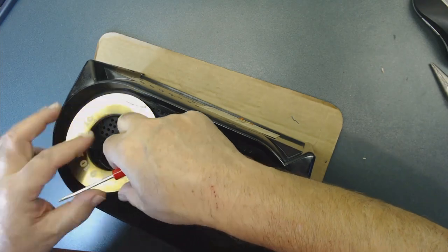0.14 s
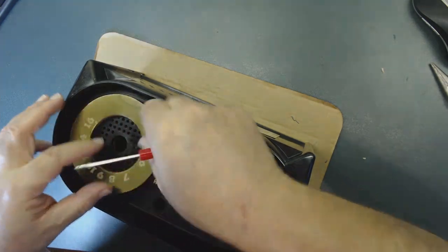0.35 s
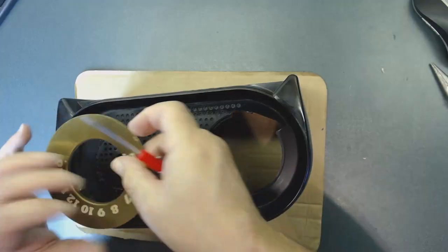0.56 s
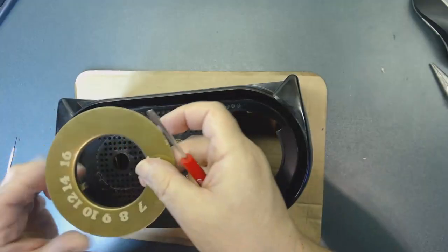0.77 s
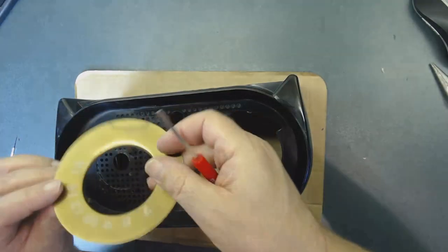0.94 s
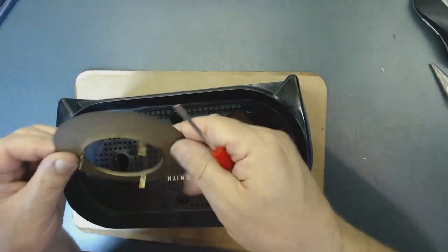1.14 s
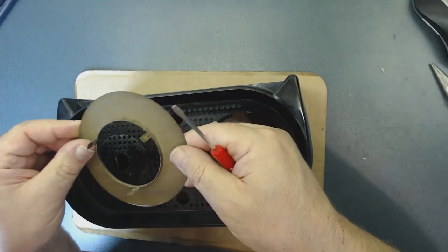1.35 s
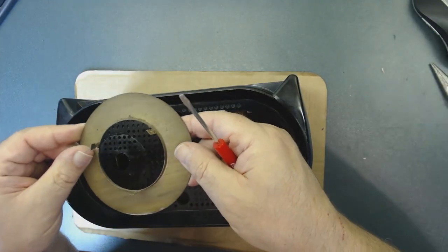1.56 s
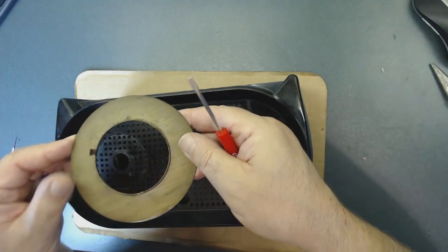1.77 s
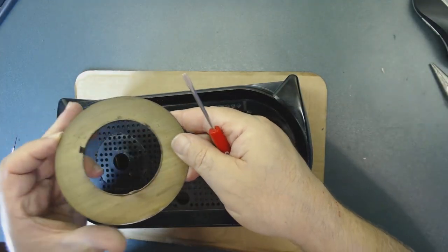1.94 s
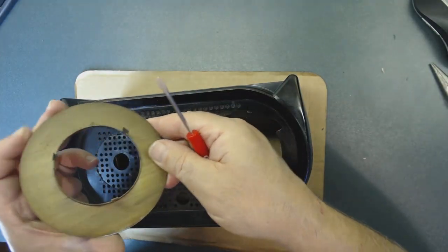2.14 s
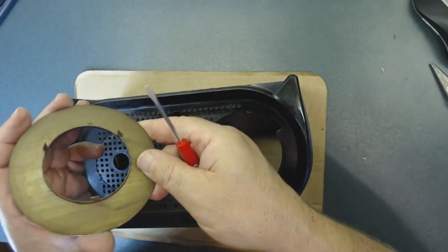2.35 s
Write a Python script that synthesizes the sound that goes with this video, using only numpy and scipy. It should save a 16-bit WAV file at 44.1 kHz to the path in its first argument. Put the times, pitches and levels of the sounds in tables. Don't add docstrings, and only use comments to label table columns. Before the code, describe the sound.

Metal ring snaps free of a plastic housing with a sharp clack, then soft handling scrapes

```python
import sys
import numpy as np
from scipy import signal
from scipy.fft import rfft, irfft, next_fast_len
from scipy.io import wavfile
from scipy.ndimage import uniform_filter1d, map_coordinates

SR = 44100
rng = np.random.default_rng(int(sys.argv[2]) if len(sys.argv) > 2 else 0)


def ratio_of_db(decibels):
    return 10 ** (np.asarray(decibels, float) / 20)


def transcribe(signal):
    frames = np.atleast_2d(signal).T
    limited = np.clip(frames, -1, 1)
    pcm = np.round(limited * 32767).astype(np.int16)
    wavfile.write(sys.argv[1], SR, pcm)


N = 110250


def unit(x):
    return x / np.sqrt(np.mean(x ** 2) + 1e-20)


def along(points, hz):
    f, v = np.transpose(points)
    return np.interp(np.log(hz + 1), np.log(f + 1), v)


def wobble(rate, size=N):
    knots = rng.standard_normal(int(size * rate / SR) + 4)
    return map_coordinates(knots, [np.arange(size) * rate / SR])


def filtered(x, response):
    m = next_fast_len(x.shape[-1] + 8192)
    return irfft(rfft(x, m) * response(np.fft.rfftfreq(m, 1 / SR)), m)[..., :x.shape[-1]]


def body(peaks, f):
    total = 0
    for k, (centre, width, db) in enumerate(peaks):
        damping = 1j * f * width
        total = total + (-1) ** k * ratio_of_db(db) * damping / (centre * centre - f * f + damping)
    return total


def add(track, s, x):
    part = track[round(s * SR):][:len(x)]
    part += x[:len(part)]


# (frequency [Hz], level [dB per Hz])
AIR_COLOUR = [(40,-25.5),(70,2),(240,-2),(700,-10),(2200,-18),(4600,-24.5),(7000,-24),(8300,-32.5),(9500,-120)]


def air_noise():
    return unit(filtered(rng.standard_normal(N), lambda f: ratio_of_db(along(AIR_COLOUR, f))))


# (time [s], level [dB])
AIR_LEVEL = [(0, -74), (.4, -75.5), (.65, -80), (.85, -77.5), (1.05, -80), (1.4, -77), (1.5, -80),
             (1.7, -79), (1.82, -82), (2.0, -79), (2.22, -81), (2.5, -80)]


def room_air():
    over_db = 9
    level_db = np.interp(np.arange(N) / SR, *np.transpose(AIR_LEVEL)) + over_db + .6 * wobble(5.4)
    return air_noise() * ratio_of_db(level_db)


def bench_hum():
    hum_hz, width_hz, level_db = 118, 30, -74.5
    hum = unit(filtered(rng.standard_normal(N), lambda f: body([(hum_hz, width_hz, 0)], f) ** 2))
    return hum * ratio_of_db(level_db + 2.2 * wobble(12))


# (frequency [Hz], level [dB])
WHINE_TONES = [(689, -86.5), (2300, -94), (4603, -86), (6902, -84)]
# (time [s], gain [dB])
WHINE_LEVEL = [(0, 11.5), (.4, 5.5), (1, 3.5), (2.5, 0.5)]


def camera_whine():
    frame_s, pause_s, pause_at_s = 0.057, 0.0054, 0.019
    t = np.arange(N) / SR
    on = uniform_filter1d(((t - pause_at_s) % frame_s > pause_s) * 1., size=60)
    whine = np.zeros(N)
    for hz, db in WHINE_TONES:
        level = ratio_of_db(db + 1.4 * wobble(49))
        whine += level * np.sin(2 * np.pi * hz * t + .4 * wobble(27))
    return on * whine * ratio_of_db(np.interp(t, *np.transpose(WHINE_LEVEL)))


def port_difference(air):
    stray = air_noise() * np.std(air) * ratio_of_db(-16)
    rumble = unit(filtered(rng.standard_normal(N), lambda f: body([(30, 30, 0)], f) ** 2))
    return stray + rumble * ratio_of_db(-90 + 20.5)


# (frequency [Hz], t60 [s])
ROOM_DECAY = [(100, 0.3), (500, 0.16), (2000, .22), (7000, 0.11)]


def room(x):
    hz, t, z = signal.stft(rng.standard_normal(SR // 2), SR, nperseg=256)
    fade = ratio_of_db(-60 * t / along(ROOM_DECAY, hz)[:, None])
    tail = signal.istft(z * fade, SR, nperseg=256)[1]
    return signal.fftconvolve(np.pad(x, (200, 0)), tail / np.linalg.norm(tail))[:N]


def gate(x):
    threshold_db, depth_db, softness_db = -86, -14, 4.5
    z = signal.stft(x, nperseg=512, noverlap=384)[2]
    power = uniform_filter1d(uniform_filter1d(abs(z) ** 2, size=7, axis=0), size=5, axis=1)
    level_db = 10 * np.log10(abs(power) + 1e-15)
    gain = ratio_of_db(depth_db / np.exp(np.clip((level_db - threshold_db) / softness_db, -30, 30)))
    return signal.istft(z * gain, nperseg=512, noverlap=384)[1][:N]


def pushes(rows, rough):
    skew, rattle = .7, 0.39
    out, t = np.zeros(N), np.arange(SR // 5) / SR
    for s, db, hz, length in rows:
        phase = 2 * np.pi * hz * t + rough * wobble(60, size=len(t))
        swell = np.sin(np.pi * np.clip(t / length, 0, 1) ** skew)
        shape = swell * ratio_of_db(4 * rough * wobble(130, size=len(t)))
        uneven = 1 + rattle * wobble(1.3 * hz ** .8, size=len(t))
        add(out, s, ratio_of_db(db) * shape / shape.max() * np.sin(phase) * uneven)
    return out


# (time [s], peak level [dB], frequency [Hz], length [s])
BENCH_THUMPS = [(.215,-54,119,0.043),(.432,-23,112,0.042),(.49,-43.5,124.3,0.039),(.70,-76,112,0.05),(1.04,-65,125,0.055),
                (1.075,-50.5,123,0.081),(1.108,-39,141,0.023),(1.175,-49.5,130.5,0.033),(1.265,-47.5,110.8,0.032),(1.345,-53,118,0.08),
                (1.43,-48,112,0.017),(1.6,-55.5,112,0.026),(1.7,-61.5,124.6,0.18),(1.905,-49,121.5,0.031),(1.95,-46.5,110.2,0.095),(2.04,-52,118,0.018),
                (2.117,-39,123,0.027),(2.148,-42,118,0.03),(2.305,-51.5,117,0.035),(2.423,-40.5,116.9,0.025),(2.485,-47.5,122.7,0.032)]


def thumps():
    return pushes(BENCH_THUMPS, rough=.35)


# (time [s], peak level [dB], frequency [Hz], length [s])
CABINET_KNOCKS = [(.11,-38.5,415,0.055),(.118,-44.5,626.4,0.045),(.165,-54.5,415,0.057),(.24,-43,404.3,0.027),(.298,-40.5,351.5,0.03),
                  (.438,-19,363,0.028),(1.11,-50.5,363.7,0.05),(1.295,-60,378,0.038),(1.529,-43,420.7,0.023),(1.895,-58.5,333.2,0.029),
                  (1.935,-59.5,360,0.014),(2.088,-41.5,415,0.032),(2.31,-41,415,0.056),(2.375,-59.5,366,0.033),(2.482,-46,391,0.041),
                  (.218,-33,748.3,0.039),(.432,-19.5,786,0.052),(1.286,-45.5,683,0.025),
                  (.474,-33,440,0.027),(.5,-33,432,.03),(.536,-42.5,430,0.029),(.47,-34.5,755,.04),(.52,-44,780,0.032),(.53,-46,345,.04),
                  (2.283,-56,290,.025),(2.07,-52,985,0.059),(.433,-23,221.6,.028)]


def knocks():
    return pushes(CABINET_KNOCKS, rough=.8)


# (time [s], peak level [dB], frequency
# [Hz], length [s])
SKIN_SQUEALS = [(.104,-45,1500,0.031),(.172,-54,2050,0.045),(.243,-37,1680,0.048),(1.115,-66,1523,0.023),
                (1.153,-54.5,1495,0.054),(1.16,-53,3600,0.028),(1.168,-54,7030,0.031),(2.036,-47,2500,0.026),(2.038,-54,1980,0.022),
                (2.045,-54.5,1300,0.022),(2.09,-52.5,1750,0.031),(2.033,-47.5,4350,0.024),(2.31,-55,1740,0.024),(2.34,-60.5,2000,0.028),(2.28,-55.5,1950,0.042),
                (0.24,-39,2200,0.026),(0.21,-50.5,4500,0.05),(.215,-65,11000,0.055),(2.283,-63.5,4400,0.032),(.435,-19,2950,0.014),(.43,-22,5380,.008),(1.19,-55.5,1500,0.041)]


def squeals():
    return pushes(SKIN_SQUEALS, rough=1.0)


def excite(envelope, centre_hz, peaks, body_db):
    grit_db = 2.5
    spread_oct, fall = 0.69, 0.99
    dull_oct, dull_fall = 1.2, 3.5
    chance_db, chance_hz = 4.5, 99.68
    grit = rng.standard_normal(len(envelope)) * ratio_of_db(grit_db * wobble(400, size=len(envelope)))
    chance = rng.standard_normal(1000)

    def colour(f):
        octaves = np.log2(f / centre_hz + 0.0082)
        hump = (1 + (octaves / spread_oct) ** 2) ** -fall
        dull = 1 + (f / centre_hz / 2 ** dull_oct) ** dull_fall
        contact = ratio_of_db(chance_db * map_coordinates(chance, [f / chance_hz]))
        dip = abs(1 - .7 * body([(1200, 450, 0)], f))
        return hump / dull * (contact + ratio_of_db(body_db) * body(peaks, f)) * dip

    x = filtered(grit * envelope, colour)
    return x / np.linalg.norm(x) * np.linalg.norm(envelope)


# (time [s], length [s], level [dB], centre [Hz], rise share [0-1])
SCRAPES = [(0.084,0.085,-46.5,2190,.45),(.165,.05,-61.5,1480,.4),(0.214,.08,-38.5,2290,.18),(0.216,0.095,-46,4300,0.18),
           (0.274,.06,-53,2051,0.5),(1.11,0.008,-67.5,3000,0.16),(1.163,0.026,-54.5,4450,.7),(1.185,0.051,-48,3840,0.11),
           (1.234,0.07,-63,2980,0.06),(1.287,0.036,-52,2440,0.2),(1.291,0.027,-61.5,6340,0.3),(1.397,0.089,-70,870,0.39),
           (1.53,0.029,-59.5,2800,0.24),(1.618,0.065,-69,2300,0.42),(1.9,0.094,-71,3070,0.55),(2.028,0.038,-54,3830,0.53),
           (2.035,0.1,-53.5,2166,0.33),(2.069,0.052,-51,980,0.78),(2.14,0.0493,-66,890,0.5),(2.276,0.058,-55,2600,0.4),
           (2.301,0.069,-52,2260,0.4),(2.305,0.084,-49,780,0),(2.363,.05,-71.5,2640,.3),(2.475,0.094,-52,2500,.5),
           (1.1909,0.0087,-41.5,4580,0.14),(1.197,0.01,-46,3700,0.02),(1.072,0.0075,-69,6240,.3),(1.113,0.023,-71,3770,0.35),(1.315,0.02,-67,2980,0),
           (2.137,0.041,-63.5,1700,0.25),(2.124,0.053,-54.5,329,0),(0.139,.025,-51.5,920,0.3),(.25,0.076,-51,560,.5),(1.169,0.065,-58,260,0.45),(2.06,.06,-62.5,3200,.7),(1.53,0.047,-59,582,0.23)]
# (frequency [Hz], width [Hz], level [dB])
SCRAPED_CABINET = [(415, 25, 11), (766, 52, 11), (1705, 56, 0), (2250, 29, -8.5), (2620, 87, -44),
                   (3580, 49, -28.5), (4200, 45, -16), (4400, 31, -18.5), (5390, 31, -18)]


def rubs():
    out, t = np.zeros(N), np.arange(SR // 4) / SR
    for s, length, db, centre_hz, rise in SCRAPES:
        peak_s = length * np.clip(rise, .02, .95)
        shape = np.sin(np.interp(t, [0, peak_s, length], [0, np.pi / 2, 0])) ** 1.6
        add(out, s, ratio_of_db(db) * excite(shape, centre_hz, SCRAPED_CABINET, body_db=12.5))
    return out


# (time [s], peak level [dB], centre [Hz], burst t60 [s])
SNAP_CONTACTS = [
    (0.43,-14,5060,0.021),
    (0.43,-15,1820,0.081),
    (0.44,-16,2880,.03),
    (0.45,-24,1330,0.079),
    (.44,-17,367,.09),
    (.47,-41.5,2050,0.31),
    (0.48,-35,460,0.16),
    (.445,-35,4600,0.2),
    (0.44,-63,1700,.5),
    (.76,-75,2250,.6),
]
# (frequency [Hz], width [Hz], level [dB])
SNAPPED_CABINET = [(171,40,-8),(227.2,31,-12.5),(342,18,-4.5),(440.6,25,-4),(531,58,-7),(786,22,-3),(1163,60,-4),(1791,50,-3.5),(2780,690,-8),(3017,160,-1),(4400,52,-19.5),(5360,170,-3)]


def snap():
    out, t = np.zeros(N), np.arange(SR) / SR
    for s, db, centre_hz, t60 in SNAP_CONTACTS:
        burst = ratio_of_db(-60 * t / t60) * (1 - np.exp(-25 * t / t60))
        add(out, s, ratio_of_db(db) * excite(burst, centre_hz, SNAPPED_CABINET, body_db=19.5))
    return out


# (frequency [Hz], level [dB], t60 [s])
RING_MODES = [(440,-11.5,.25),(627,-15,0.22),(1104.5,-26,0.97),(2051,-16.5,0.61),(1206,-44,.9),(1840,-20,0.18),(3520,-30.5,.21),(5943,-42,0.28),(2670,-33.5,.4),(2918,-33,.3),(4480,-24,.3),(5099,-39,0.9),(6900,-30,0.31)]


def ring_song():
    start_s, level_db = .44, -20
    drop_s, drop_per_khz_s, drop_db = .865, .082, -9
    t = np.arange(SR) / SR
    ring = np.zeros(SR)
    for hz, db, t60 in RING_MODES:
        dropped_s = drop_s - drop_per_khz_s * min(hz / 1000, 3)
        drop = drop_db * np.clip((t + start_s - dropped_s) / 0.015, 0, 1)
        level = ratio_of_db(db + 1.6 * wobble(35, size=SR) - 60 * t / t60 + drop)
        ring += level * np.sin(2 * np.pi * hz * t + .4 * wobble(45, size=SR))
    song = np.zeros(N)
    add(song, start_s, ratio_of_db(level_db) * ring * (1 - np.exp(-t / .004)))
    return song


# (frequency [Hz], left over right [dB])
PORT_LEAN = [(40,0.1),(120,-6.5),(300,0.5),(410,6),(900,3.5),(2000,1),(3200,-4.5),(4400,-1.5),(6000,1.5)]


def lean(x, share):
    sides = np.array([[.5], [-.5]])
    return filtered(x[None], lambda f: ratio_of_db(share * along(PORT_LEAN, f) * sides))


def scene():
    room_db, apart_db = -14, -13.5
    air = room_air()
    still = air + bench_hum() + camera_whine()
    soft = thumps() + knocks() + squeals() + rubs()
    hit = snap()
    near = soft + hit
    mono = soft + ring_song() + gate(hit + ratio_of_db(room_db) * room(near))
    apart = ratio_of_db(room_db + apart_db) * gate(room(near)) + port_difference(air)
    return lean(mono, 1) + lean(still, 0.75) + apart * np.array([[1], [-1]])


def low_pass(x):
    return signal.sosfilt(signal.butter(12, 8410, fs=SR, output="sos"), x)


def record(dry):
    low_hz, top_hz, edge_hz, hiss_db = 71, 7190, 9000, -97

    def microphone(hz):
        bass_cut = (1j * hz / (low_hz + 1j * hz)) ** 3
        return bass_cut / (1 + (hz / top_hz) ** 24) / (1 + (hz / edge_hz) ** 80)

    hiss = ratio_of_db(hiss_db) * rng.standard_normal(dry.shape)
    return low_pass(filtered(dry, microphone) + hiss)


dry = scene()
out = record(dry)
transcribe(out)
```